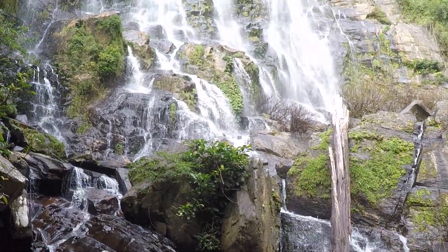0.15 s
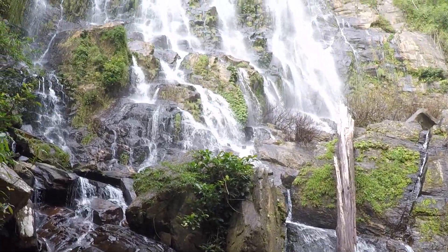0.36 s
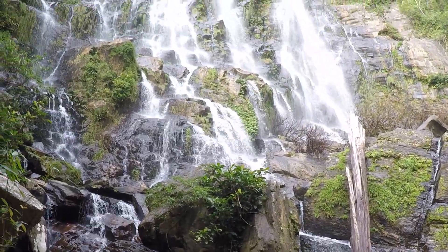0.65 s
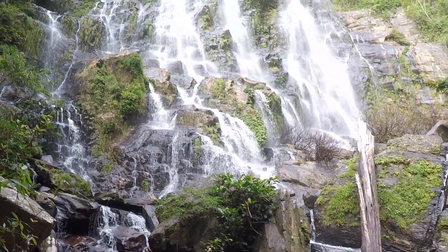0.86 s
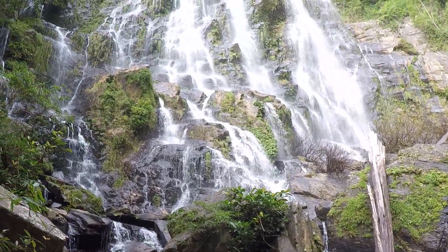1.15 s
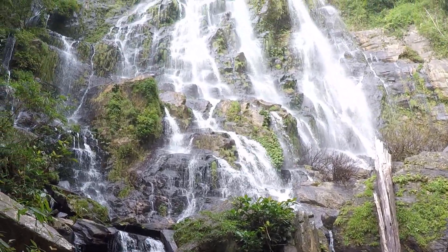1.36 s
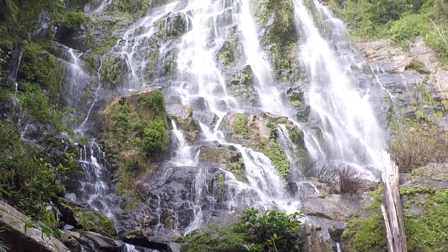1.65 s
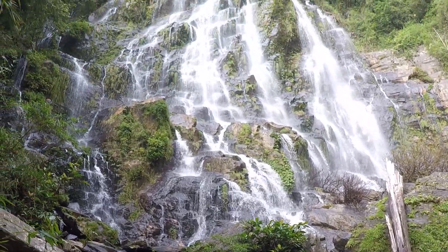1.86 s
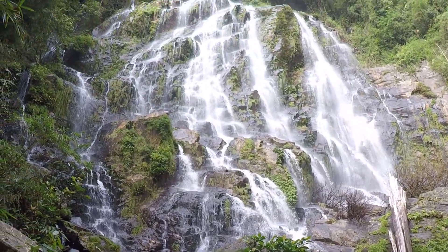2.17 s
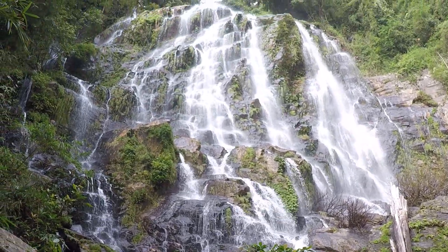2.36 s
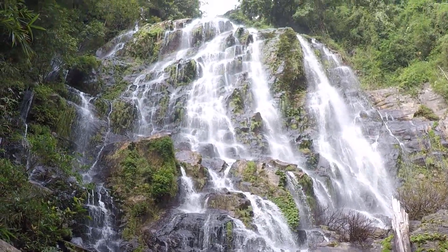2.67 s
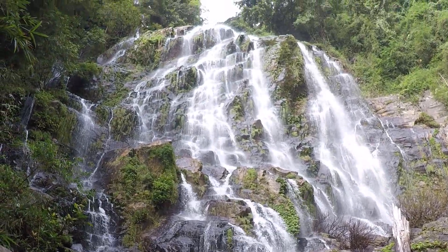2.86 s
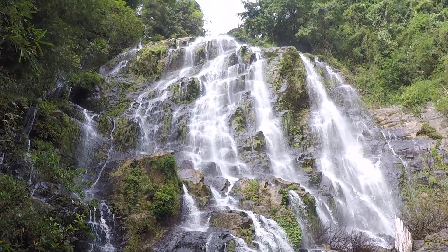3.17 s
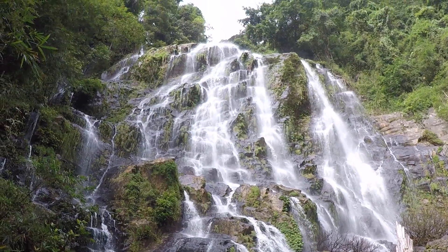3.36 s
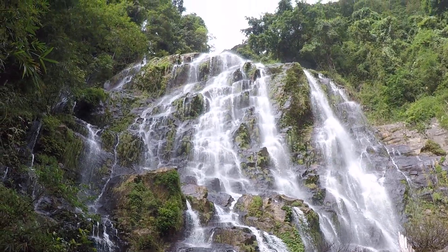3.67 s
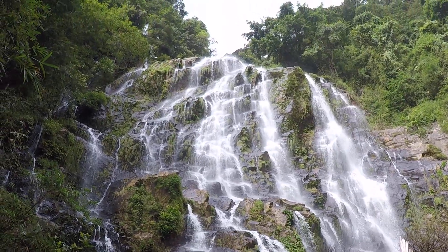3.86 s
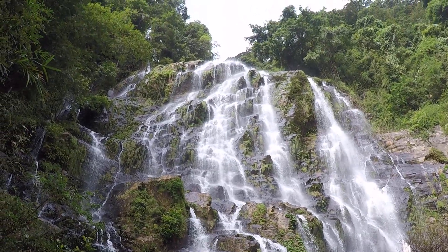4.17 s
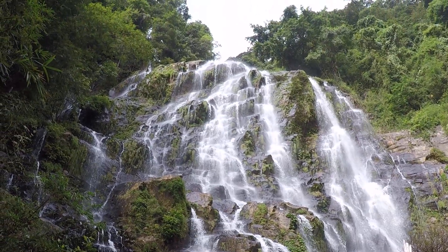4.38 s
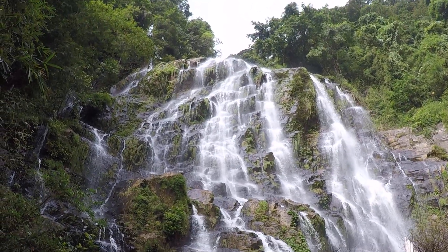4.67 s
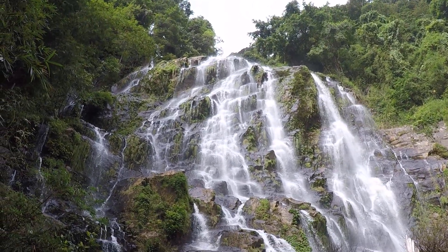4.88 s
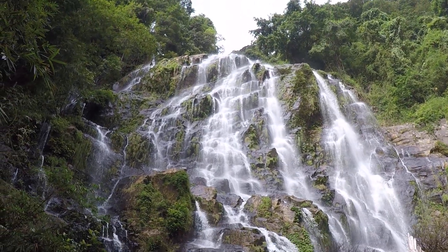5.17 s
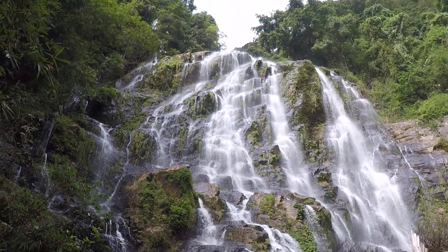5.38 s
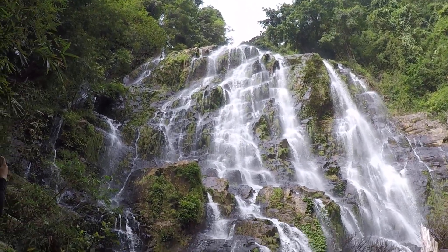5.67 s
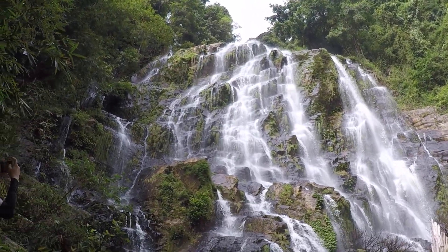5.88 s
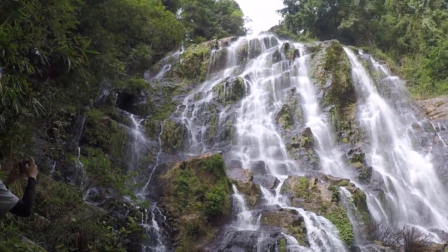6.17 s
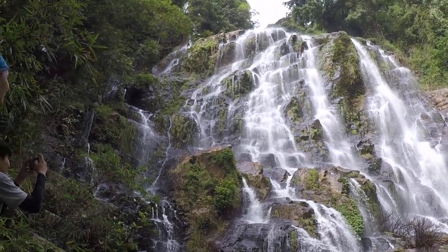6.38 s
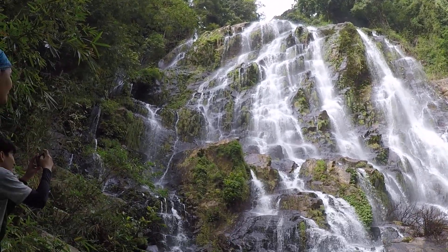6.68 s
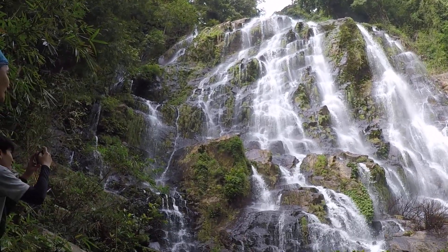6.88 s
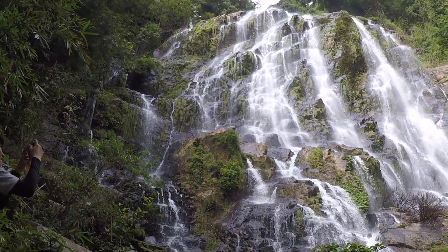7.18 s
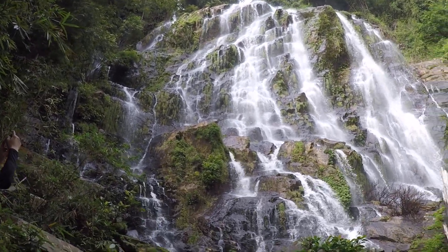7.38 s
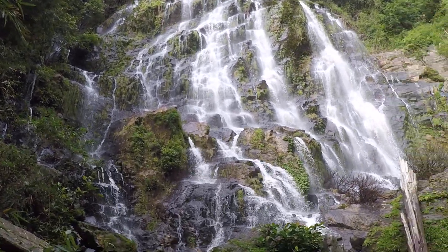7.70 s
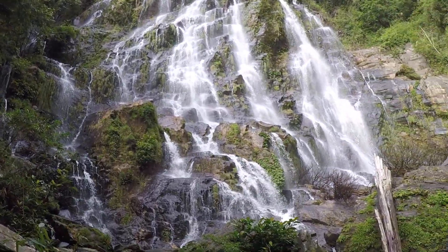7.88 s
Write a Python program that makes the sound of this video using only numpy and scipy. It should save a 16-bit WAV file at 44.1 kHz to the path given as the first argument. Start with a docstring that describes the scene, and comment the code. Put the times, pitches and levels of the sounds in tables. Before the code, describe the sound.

A tall waterfall hisses steadily, dull and centred at first then opening wide and bright, while soft uneven knocks thump on the hand-held camera.

```python
"""A tall waterfall, heard through the two microphone ports of a hand-held camera.
At first its hiss is dull and centred, soft knocks thump on the camera and a draught rumbles.
Then the hiss eases open, wide and bright, and the draught dies down but for a few puffs.
Knocks keep landing at uneven times, now without their deep bass and edge, until they thin out near the end.
Water and draught are shaped noise; each knock is a set of short decaying rings."""
import sys
import numpy as np
from scipy import signal
from scipy.fft import rfft, irfft
from scipy.io import wavfile
from scipy.ndimage import uniform_filter1d

SR = 44100
rng = np.random.default_rng(int(sys.argv[2]) if len(sys.argv) > 2 else 0)


def to_wav(sig):
    """Store sig (one row per channel, or 1-D mono) as 16-bit WAV at the path in sys.argv[1].

    Samples outside -1..1 are clipped; the rate is SR.
    """
    pcm = np.clip(np.atleast_2d(sig), -1, 1) * 32767
    pcm = np.round(pcm).astype(np.int16)
    wavfile.write(sys.argv[1], SR, pcm.T)  # frames by channels


N = 354563
TIME = np.arange(N) / SR
HZ = np.fft.rfftfreq(N, 1 / SR)
# the sound stays dull and centred until OPEN_AT_S, then eases open with this time constant
OPEN_AT_S, OPEN_EASE_S = 0.41, 0.97


def gain_of(db):
    """Decibels to amplitude."""
    return 10 ** (np.asarray(db) / 20)


def evened(x):
    """Scales to an rms of one."""
    return x / np.sqrt(np.mean(x ** 2) + 1e-20)


def read(table, hz):
    """Every column of a spectrum table, joined by lines on a log-frequency axis."""
    table_hz, *columns = np.transpose(table)
    return np.array([np.interp(np.log(hz + 1), np.log(table_hz + 1), column) for column in columns])


def follow(table):
    """A two-column timeline, joined by straight lines over the whole scene."""
    return np.interp(TIME, *np.transpose(table))


def add(mix, start_s, sound):
    """Mixes a stereo sound in at its start time."""
    start = max(round(start_s * SR), 0)
    part = mix[:, start:][:, :sound.shape[1]]
    part += sound[:, :part.shape[1]]


def openness(t):
    """Share of the wide, bright sound: none at first, then an exponential approach to all of it."""
    return 1 - np.exp(-np.maximum(t - OPEN_AT_S, 0) / OPEN_EASE_S)


def crossfade(opened, closed, t):
    """Blends from the closed sound to the opened one by the openness at time t."""
    return openness(t) * opened + (1 - openness(t)) * closed


# Colour of the falling water. Each row: frequency in Hz, relative left and right level in dB per Hz.
WATER = [(60.4, -40, -31), (119, -22, -36), (152, 0, -5), (240, 0, -5.5), (398, -4, -13.5),
         (622, -6.5, -13.5), (1154, -1.3, -0.3), (2620, 0.7, -1.5), (4820, 1.5, 2.5), (7480, -6.5, -0.5),
         (8360, -18, -25.5), (8570, -12.5, -15.5), (9820, -17, -20.5), (10420, -35, -20.5),
         (11300, -32.5, -35), (12400, -27.5, -29), (15100, -43, -42)]
# Peaks and dips of the microphone ports.
# Each row: centre in Hz, width (standard deviation) in Hz, left and right boost in dB.
PORTS = [(820, 173, 5, 9.5), (1314, 152, 2, 9), (1440, 110, -2.5, 4), (1665, 34, -1, -4.5),
         (1750, 200, 2.5, 3.5), (2313, 71, -24, 2.5), (2877, 110, -8, -0.5), (3233, 65, 4.5, -1),
         (3960, 155, -5.5, -1.5), (4070, 200, -2, -1), (4440, 84, 0.5, -2.5), (6600, 515, 4.5, -12)]
# How alike the ports hear the water. Each row: frequency in Hz, coherence 0-1, left's lead in radians.
PAIR = [(100, .65, .3), (220, .72, .2), (370, .38, -.6), (520, .6, -2.5), (800, .96, -2.1), (1400, .94, -3),
        (1620, .76, -3.1), (1750, .72, -4.5), (2050, .67, -6), (2300, .25, -7.4), (2550, .34, -9.3),
        (2900, .05, -5), (3200, .68, -5.3), (3600, .7, -6.1), (3950, .66, -6.7), (4300, .58, -5.4),
        (4600, .62, -3), (5100, .58, -2.7), (5500, .33, -3.2), (5900, .3, -2), (6300, .39, -2.9),
        (6900, .65, -3.6), (7600, .48, -2.4), (8800, .19, -.6), (10500, .55, 0), (12500, .45, 0),
        (14000, .05, 0)]
# The camera tips up to the crest and back. Each row: time in seconds, upward tilt 0-1.
TILT = [(0.3, 0), (1.5, .3), (3.2, 0.9), (5.2, 1), (6.6, 1), (8.04, 0.06)]
# Colour the wide sound gains as the camera is lowered. Each row: frequency in Hz, boost in dB.
LOWERED = [(350, -0.5), (550, 3.5), (720, 0), (860, -7.5), (1120, 4), (1400, -2), (1700, 0.5), (2000, 0),
           (2500, 0.5), (3300, 0), (7000, 0)]
# Colour of the dull, centred hiss. Each row: frequency in Hz, relative level in dB per Hz.
DULL = [(130, -2), (250, -1), (380, -9), (520, -3), (680, -9.5), (890, -1), (1020, -4), (1250, 3),
        (1430, 8.5), (1580, -1), (1800, -0.5), (1930, -1.5), (2080, 3.5), (2450, -1), (2850, -6),
        (3350, -1), (4050, -11.5), (4370, -7.5), (4700, -12.5), (6500, -13), (9000, -25.5), (11500, -32),
        (12500, -28), (15000, -38)]
# Lag of the dull hiss behind the wide sound at the left port. Each row: frequency in Hz, lag in radians.
LAG = [(280, 0), (550, -1.6), (1050, -0.5), (1400, 0.6), (1750, 2.5), (2000, 2), (2230, 1.1), (2550, 1.1),
       (3700, 4.5), (4300, -0.6), (4800, 3.5), (5900, 1.6), (6450, 1.5), (7800, 1.54)]
WIDE_DB, DULL_DB = -25, -34.5  # rms levels in dB before the crossfade


def waterfall():
    """The roar reaches two partly alike ports, each with its own resonances; tilt shifts the colour."""
    colour_db = read(WATER, HZ)
    for centre_hz, width_hz, *ears_db in PORTS:
        bump = np.exp(-.5 * ((HZ - centre_hz) / width_hz) ** 2)
        colour_db = colour_db + np.outer(ears_db, bump)
    alike, lead = read(PAIR, HZ)
    alike = np.clip(alike, 0, 1)
    left = churn()
    right = alike * np.exp(-1j * lead) * left + np.sqrt(1 - alike ** 2) * churn()
    ports = np.array([left, right]) * gain_of(colour_db)

    tilt = follow(TILT)
    raised = irfft(ports, N)
    lowered = irfft(ports * gain_of(read(LOWERED, HZ)), N)
    wide = gain_of(WIDE_DB) * evened(tilt * raised + (1 - tilt) * lowered)

    # the centred hiss is the same water, shifted in phase, so the two turn hollow while they overlap
    late = left * np.exp(-1j * read(LAG, HZ))
    centred = gain_of(DULL_DB) * evened(irfft(late * gain_of(read(DULL, HZ)), N))
    return crossfade(wide, centred, TIME)


def churn(patch_db=0.6, splash_db=0.5, swell_db=-0.19):
    """Spectrum of the noise of countless drops, made uneven by clumps of water landing."""
    shape = (N // 256 + 5, 513)  # time frames, frequency bins
    real, imag, patches, splashes = rng.standard_normal((4,) + shape)
    swell = rng.standard_normal((shape[0], 1))
    # patches last longer in narrow bands, splashes are brief and broad, swells move the whole band
    patches = evened(uniform_filter1d(uniform_filter1d(patches, size=14, axis=0), size=12, axis=1))
    splashes = evened(uniform_filter1d(uniform_filter1d(splashes, size=4, axis=0), size=110, axis=1))
    swell = evened(uniform_filter1d(swell, size=60, axis=0))
    uneven_db = patch_db * patches + splash_db * splashes + swell_db * swell
    field = (real + 1j * imag) * gain_of(uneven_db)
    noise = signal.istft(field.T, nperseg=1024, noverlap=768)[1][:N]
    return rfft(evened(noise))


# Knocks on the camera.
# Each row: start in seconds, strength in dB, middle pitch in Hz, hardness 0-1.
KNOCKS = [(.309, -24, 187, 0.6), (0.3528, -17.5, 151, 0.7), (0.4807, -13, 159, 0.65),
          (0.5745, -15.5, 152, 0.54), (0.606, -14, 142, 0.76), (0.837, -14.5, 195, 0.26),
          (0.9245, -18, 184, 0), (0.978, -16.5, 190, .05), (1.472, -18, 190, .1), (1.915, -14.5, 174, 0.23),
          (2.1145, -19, 191, 0), (2.2247, -16.5, 195, 0), (2.3463, -21, 215, 0.2), (2.569, -16.5, 185, 0),
          (2.659, -13, 194, 0), (2.8176, -9.5, 197, 0.47), (2.928, -31, 183, 0), (2.952, -8.5, 184, 0.1),
          (2.9768, -13, 170, 0), (3.085, -9.5, 181, 0.16), (3.431, -16.5, 202, 0.3), (3.55, -8, 183, 0),
          (3.6172, -17, 175, 0.2), (3.927, -31, 197, 0.1), (3.9562, -4, 202, 0.15), (4.046, -16, 186, 0.3),
          (4.1912, -10, 209, 0.5), (4.354, -14.5, 168, 0), (4.497, -3, 202, 0.07), (4.957, -7, 204, 0.1),
          (5.121, -9, 197, 0.16), (5.263, -19, 165, 0.1), (5.323, -14.5, 180, 0.1),
          (5.412, -11.5, 173, 0.24), (5.7806, -16, 210, 0), (5.8616, -16, 216, 0), (5.9536, -14, 154, 0),
          (6.0127, -17, 191, 0.1), (6.0877, -11.5, 201, 0), (7.264, -22, 221, 0.03),
          (7.5189, -11.5, 198, 0.16), (7.637, -16.5, 192, 0.1)]
# at first the light case answers this long before the heavier body; the two merge as the sound opens
CLACK_LEAD_S = 0.0031


def handling(faint_db=-34, spread_db=3, faint_hz=200, top_hz=600, count=30):
    """Clear knocks, with fainter ones scattered between them, ring the camera's body and case."""
    thuds, clacks = np.zeros((2, 2, N))
    for start_s, db, hz, hardness in KNOCKS:
        add(thuds, start_s, knock(start_s, db, hz, hardness))
        lead_s = CLACK_LEAD_S * (1 - openness(start_s))
        add(clacks, start_s - lead_s, clack(db, hardness))
    for when, force, pitch in rng.uniform(-1, 1, (count, 3)):
        start_s = (when + 1) / 2 * KNOCKS[-1][0]
        faint = knock(start_s, faint_db + spread_db * force, faint_hz * (1 + .15 * pitch), hardness=0)
        add(thuds, start_s, faint)
    # as the sound opens the thuds lose their bass and their edge, and turn round
    full = low_cut(thuds, edge_hz=125, leak_db=-3)
    lean = low_cut(thuds, edge_hz=138.5, leak_db=-25)
    treble_loss = np.sqrt(1 + (HZ / top_hz) ** 6)
    rounded = irfft(rfft(lean) / treble_loss, N)
    return clacks + crossfade(rounded, full, TIME)


# Modes of the camera body.
# Each row: multiple of the pitch, left and right level in dB, 60 dB decay time in seconds.
BODY = [(1, 0.5, -14, 0.038), (1.6, -27, 3, 0.0074), (.75, 3, -4, 0.022), (1.33, -30, -28, 0.19)]
# each ring starts a share SAG above its pitch and sags as far below it, with time constant SAG_S
SAG, SAG_S = 0.045, 0.0071
HARD_SAG = 0.3  # further share of sag at full hardness


def knock(start_s, db, hz, hardness, rise=0.0035):
    """The body's short, sagging rings start alike at both ports and part as the sound opens."""
    t = np.arange(SR // 10) / SR
    sag = SAG + HARD_SAG * hardness ** 2
    turns = hz * ((1 - sag) * t + sag * 2 * SAG_S * (1 - np.exp(-t / SAG_S)))
    thud = 0
    for multiple, left_db, right_db, t60 in BODY:
        decay = gain_of(np.array([[left_db], [right_db]]) - 60 * t / t60)
        thud = thud + decay * np.sin(2 * np.pi * multiple * turns)
    left, right = gain_of(db) * (1 - np.exp(-t / rise)) * thud
    return np.array([left, crossfade(right, left, start_s)])


# The case's upper modes, reached by hard knocks.
# Each row: frequency in Hz, middle level in dB, 60 dB decay time in seconds.
CASE = [(564, 1, 0.017), (700, -0.5, 0.015), (930, 0, 0.013)]


def clack(db, hardness, rise=0.004, uneven_db=6.0):
    """A hard blow also rings the case, alike at both ports; each blow favours other modes."""
    t = np.arange(SR // 10) / SR
    ring = 0
    for mode_hz, mode_db, t60 in CASE:
        struck_db = mode_db + uneven_db * rng.uniform(-1, 1)
        ring = ring + gain_of(struck_db - 60 * t / t60) * np.sin(2 * np.pi * mode_hz * t)
    return np.array([ring, ring]) * gain_of(db) * hardness * (1 - np.exp(-t / rise))


def low_cut(x, edge_hz, leak_db):
    """A steep high-pass that lets a little of the deep bass through, as set by the leak."""
    steep = (HZ / edge_hz) ** 24
    return irfft(rfft(x) * (gain_of(leak_db) + steep) / (1 + steep), N)


# Strength of the draught on the microphone. Each row: time in seconds, level in dB before DRAUGHT_DB.
DRAUGHT = [(0.05, -45), (0.5, -49), (1.67, -50.5), (2.22, -53), (4.48, -73), (4.77, -63), (5.46, -65),
           (6.08, -58), (8.04, -77)]
# Colour of its rumble. Each row: frequency in Hz, relative level in dB per Hz.
RUMBLE = [(6, -10), (17, -0.5), (33, -0.5), (48, 4), (58, -3), (80, -4.5), (100, -5), (125, -9.5),
          (180, -9), (400, -33), (2000, -70)]
# Separate puffs in the draught. Each row: centre in seconds, rise in dB.
PUFFS = [(.2, 0), (.585, 7), (1.8, 5), (1.89, 3), (2.8, 3), (5.31, 5), (6.11, 3), (7.58, 9)]
DRAUGHT_DB, PUFF_S = 4, 0.042  # overall lift in dB, puff width (standard deviation) in seconds


def draught(apart=0.38):
    """Moving air buffets the microphone in lumps: one rumble at both ports, parting as the sound opens."""
    noise = rfft(rng.standard_normal((2, N)))
    shared, own = evened(irfft(noise * gain_of(read(RUMBLE, HZ)), N))
    side = apart * openness(TIME) * own
    puffs_db = sum(rise_db * np.exp(-.5 * ((TIME - centre_s) / PUFF_S) ** 2) for centre_s, rise_db in PUFFS)
    level_db = DRAUGHT_DB + follow(DRAUGHT) + puffs_db
    return gain_of(level_db) * np.array([shared + side, shared - side])


def scene():
    """Water, knocks and moving air."""
    return waterfall() + handling() + draught()


def record(dry):
    """The recorder's band limit: a steep low-pass that takes off the highest treble."""
    low_pass = signal.firwin(511, 15200, window=("kaiser", 9), fs=SR)  # edge in Hz
    return signal.oaconvolve(dry, low_pass[None], "same")


dry = scene()
out = record(dry)
to_wav(out)
```